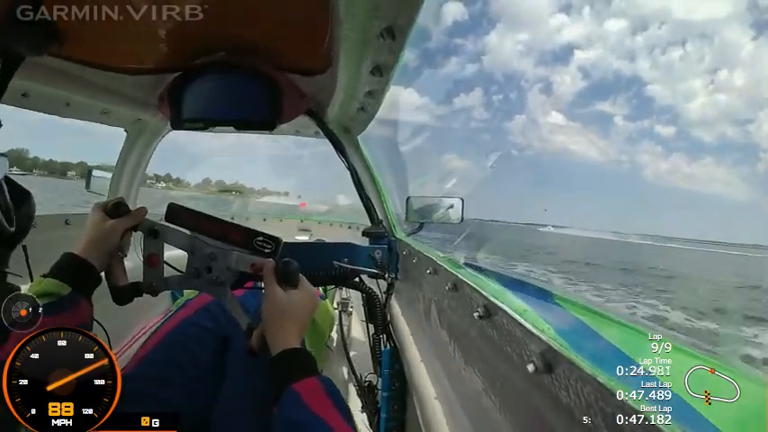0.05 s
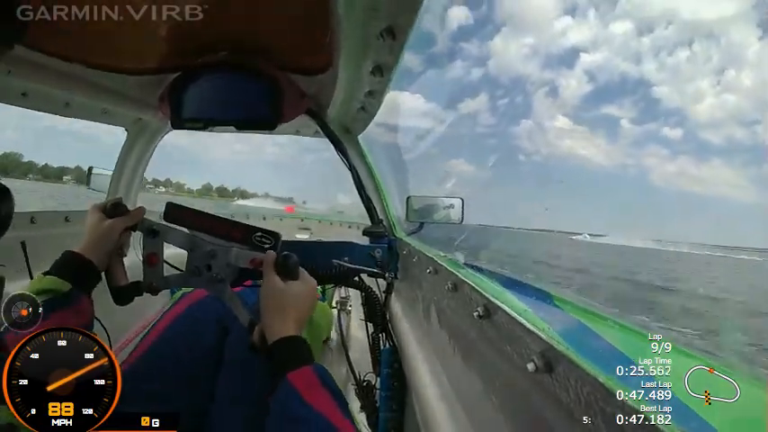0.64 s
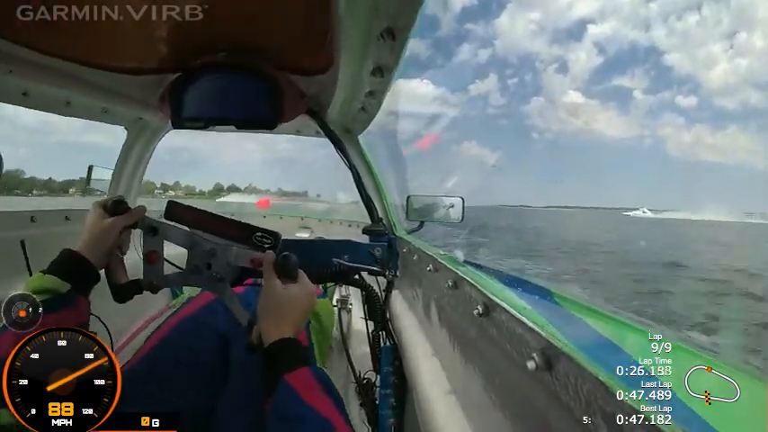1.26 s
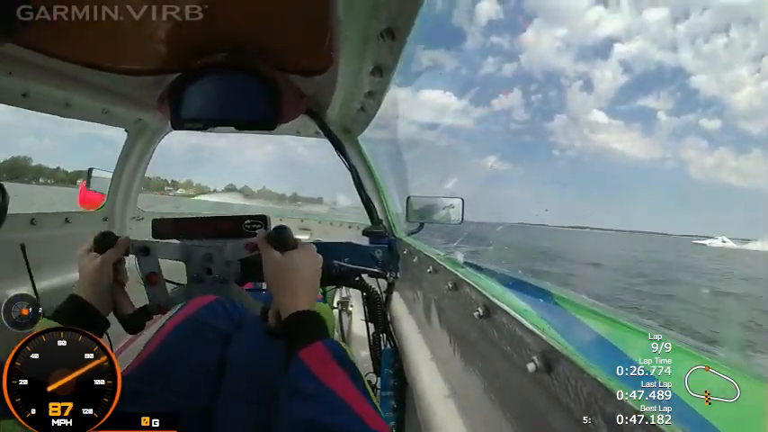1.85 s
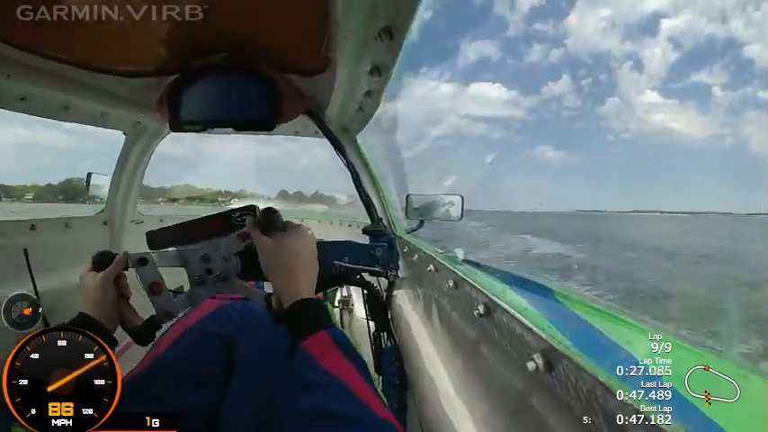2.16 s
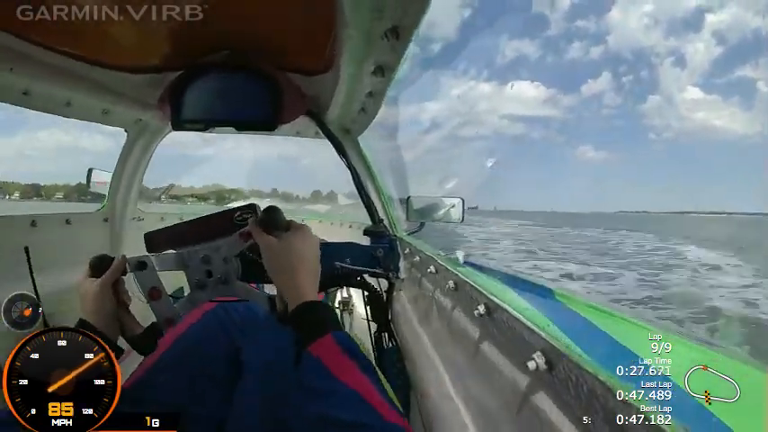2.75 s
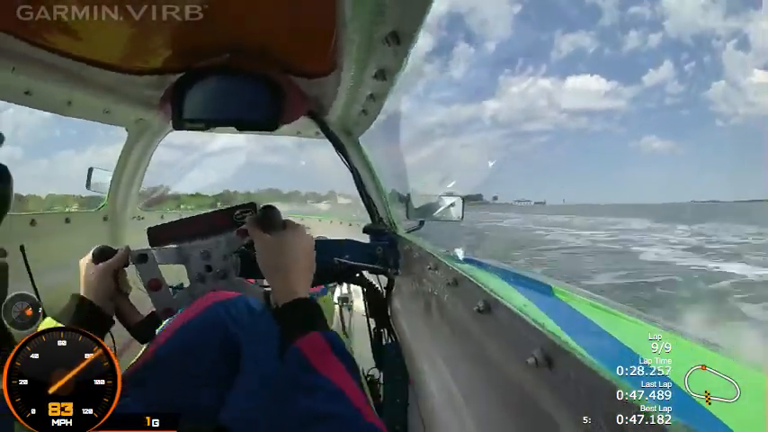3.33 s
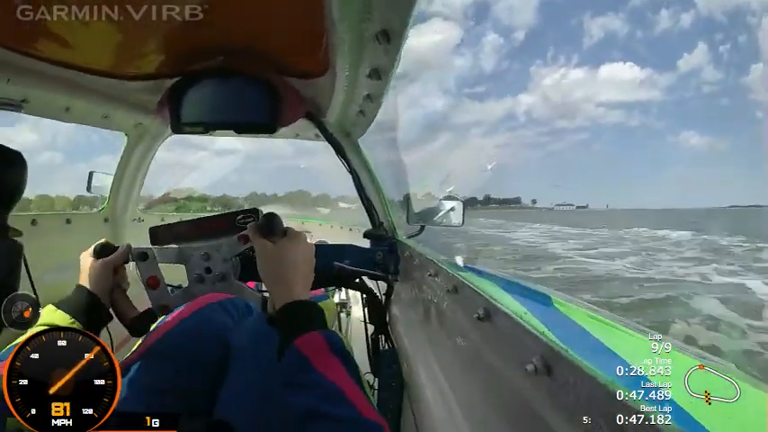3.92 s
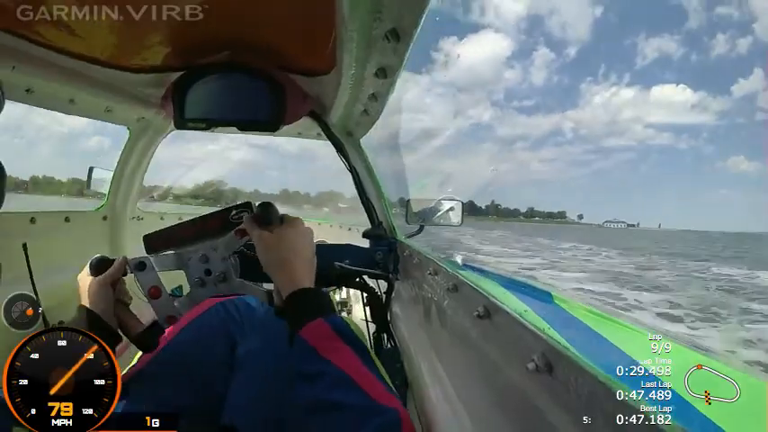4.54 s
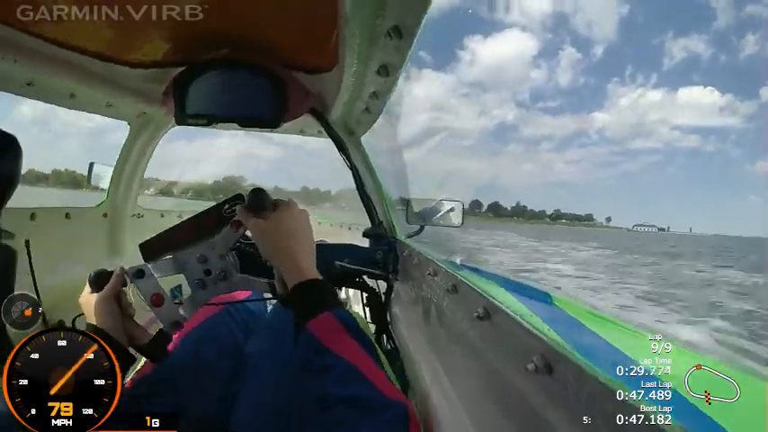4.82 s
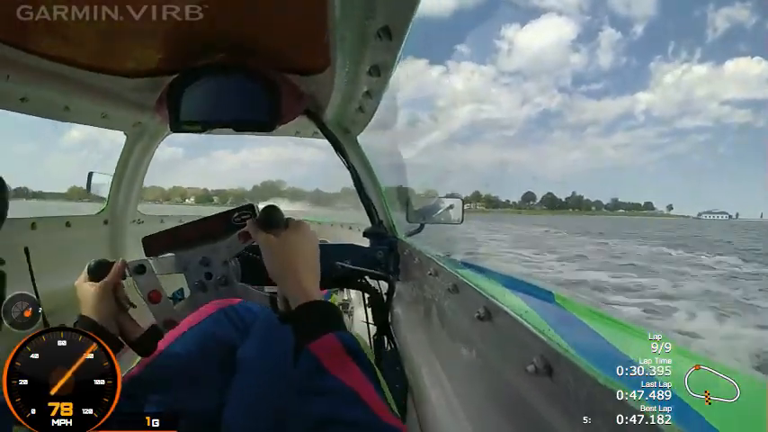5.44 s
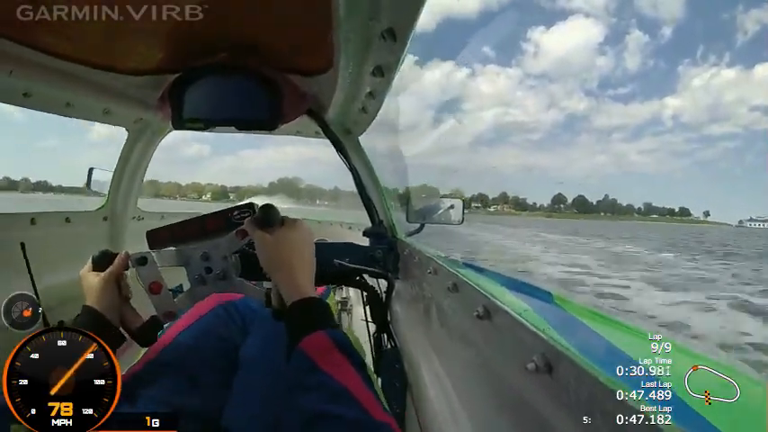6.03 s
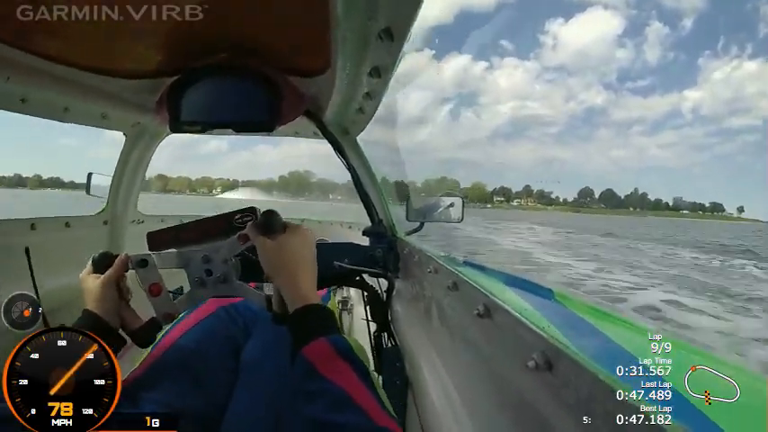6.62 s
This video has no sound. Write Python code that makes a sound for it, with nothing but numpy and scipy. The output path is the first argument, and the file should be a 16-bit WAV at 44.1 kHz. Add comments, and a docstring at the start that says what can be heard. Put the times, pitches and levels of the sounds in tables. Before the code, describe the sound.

A racing boat's engine drones loudly at full throttle from start to finish, heard inside the closed cockpit. The sound is muffled and somewhat distorted, with a nearly constant loudness. The engine's pitch keeps flicking upward and briefly sagging as the boat crosses waves. Under it, the hull drums and thumps irregularly, water rushes along the sides, and loose fittings give a faint high buzz with a few small ticks. At about 1.4 seconds the hull lands harder with a short boom. Brief slaps of spray come near 0.2 seconds and around 2 to 2.4 seconds. From about 3 to 5.3 seconds the engine wavers and surges most, with more sharp splashes around 3.3 to 3.7 and 4.3 to 4.9 seconds. One more slap comes at 6 seconds as the drone steadies a little and carries on.

```python
"""Racing boat cockpit in a turn

Inside the closed cockpit, a six-cylinder engine drones at full throttle, racing when the propeller
lifts and sagging in each wave. The hull drums, spray strikes it and loose fittings buzz and knock.
The din drives a camera's gain control and overloads its microphone, so engine and water crowd each
other out, and the camera's case muffles the sound."""
import sys
import numpy as np
from scipy import signal
from scipy.fft import rfft, irfft, next_fast_len
from scipy.io import wavfile

SR = 44100
rng = np.random.default_rng(int(sys.argv[2]) if len(sys.argv) > 2 else 0)


def store_wav(level_fs):
    """Save 16-bit WAV to argv[1]."""
    pcm = np.round(np.clip(np.atleast_2d(level_fs), -1, 1) * 32767)
    wavfile.write(sys.argv[1], SR, pcm.T.astype(np.int16))


N = 294588


def from_db(db):
    """Turn decibels into a gain to multiply by."""
    return 10 ** (np.asarray(db) / 20)


def rms_one(x):
    """Scale a signal so that its average strength (rms) is 1."""
    return x / np.sqrt(np.mean(x ** 2) + 1e-20)


def in_time(rows):
    """Join (time, value) points with straight lines, giving a value at every sample."""
    s, value = np.transpose(rows)
    return np.interp(np.arange(N) / SR, s, value)


def drift(rate):
    """A smooth random wobble of typical size 1; a higher rate makes it change faster."""
    step, warm_up = 40, 2000
    r = np.exp(-2 * np.pi * step * rate / SR)
    white = rng.standard_normal(N // step + warm_up + 2)
    slow = signal.lfilter([1], [1, -2 * r, r * r], white)[warm_up:]
    return np.interp(np.arange(N) / step, np.arange(len(slow)), rms_one(slow))


def colour(x, points):
    """Filter a sound so that its gain follows (frequency, level) points."""
    size = 2 * next_fast_len(N // 2 + SR // 2)
    hz, db = np.transpose(points)
    grid_hz = np.maximum(np.arange(size // 2 + 1) * SR / size, 1)
    gain = from_db(np.interp(np.log(grid_hz), np.log(hz), db))
    # minimum phase: the filter rings after a sound, never before it
    cepstrum = irfft(np.log(gain))
    response = np.exp(rfft(2 * cepstrum[:size // 2], size) - cepstrum[0])
    return irfft(rfft(x, size) * response)[:N]


def noise(points):
    """Noise of strength 1, shaped by (frequency, level) points."""
    return rms_one(colour(rng.standard_normal(N), points))


def swells(times, lengths, heights):
    """Add up smooth bell-shaped swells, each centred on its time."""
    t = np.arange(0, N, 40) / SR
    bells = np.exp(-np.pi * ((t[:, None] - times) / lengths) ** 2)
    return np.interp(np.arange(N) / SR, t, bells @ heights)


def burst(s, db, decay_s):
    """A loudness curve that jumps up at time s and dies away."""
    out, t = np.zeros(N + SR), np.arange(SR // 10) / SR
    start = round(s * SR)
    out[start:start + len(t)] = from_db(db) * np.exp(-t / decay_s)
    return out[:N]


def ring(x, hz, width_hz):
    """Make a sound ring at one pitch; a narrower width rings longer."""
    r = np.exp(-np.pi * width_hz / SR)
    feedback = [1, -2 * r * np.cos(2 * np.pi * hz / SR), r * r]
    return np.sqrt((1 - r * r) / 2) * signal.lfilter([1, 0, -1], feedback, x)


def wandering(hz, spread, rate):
    """A resonance kept sounding: a tone whose pitch strays by about the fraction spread."""
    pitch_hz = hz * (1 + spread * drift(rate))
    return np.sqrt(2) * np.sin(2 * np.pi * np.cumsum(pitch_hz) / SR)


def waves():
    """Three curves for what the waves do: drag the propeller, pound the hull, make the cockpit boom."""
    # each wave the hull runs through: crest t/s, length/s, relative pounding/dB, relative boom/dB
    crests = [(0.081, 0.05, 6.5, -1.5), (0.235, 0.05, -5, -17.5), (0.331, 0.054, 1, 0),
              (0.517, 0.057, -7.5, -10), (0.62, 0.078, -2.5, 2.5), (0.742, .04, -3.5, -8),
              (0.852, 0.052, -4, -8.5), (0.934, 0.084, 2, -1.5), (1.24, 0.049, -3, -21.5),
              (1.436, .12, -1, -7.5), (1.609, .045, 3.5, -11), (1.684, 0.059, -0.5, 4),
              (1.789, 0.094, -11.5, -2.5), (1.992, 0.043, 5, -12.5), (2.125, 0.042, -2.5, -15.5),
              (2.239, 0.071, 3, -3), (2.572, .05, 1.5, -20.5), (2.901, 0.036, 1, -16),
              (3.021, 0.069, 2, -11), (3.162, .06, 0.5, -19), (3.247, 0.077, 3.5, -14.5),
              (3.483, 0.057, 9, -13), (3.596, 0.046, -2, -6.5), (3.708, 0.061, 8.5, -5.5),
              (3.784, 0.058, 2.5, -5), (3.899, 0.044, -8, -14.5), (3.99, 0.034, -3, -18.5),
              (4.119, 0.065, -3, -5.5), (4.345, 0.084, 0.5, -16), (4.512, .04, -7, -14),
              (4.643, .045, 5, -8.5), (4.914, .052, -1.5, -4), (4.969, .05, 1.5, -7.5),
              (5.051, 0.075, 2, -10.5), (5.174, .045, -2, -10.5), (5.274, 0.094, -4, -7),
              (5.455, 0.035, -1.5, -11), (5.673, .045, -1.5, -6), (5.771, .08, -14, -6),
              (5.865, .04, 0, -6), (5.94, .035, -3, -4), (6.018, .05, -1, -4), (6.135, .05, -2, 0),
              (6.222, 0.076, -8, -1), (6.318, .045, 1.5, -5), (6.424, .07, -3, 2.5), (6.522, .07, 3.5, -5),
              (6.645, 0.04, -5.5, -4)]
    s, length, pounding_db, boom_db = np.transpose(crests)
    heights = np.ones(len(s)), from_db(pounding_db), from_db(boom_db)
    return [swells(s, length, height) for height in heights]


def knocks(level_db=40.0, contact_s=0.0043, bounce_s=0.0099, bounce_db=-6.5, main_hz=4900, detune=0.06):
    """A loose fitting hits its seat and bounces once, ringing at two pitches that vary with each knock."""
    # knocks: t/s, relative peak/dB, upper ring f/Hz, upper ring against main ring/dB
    hits = [(0.073, -52.5, 9080, 5.5), (0.083, -50.5, 9170, 2.5), (0.482, -51, 9270, -1),
            (0.974, -54.5, 9040, 5.5), (1.557, -55, 8730, -7), (1.578, -54.5, 9070, -3),
            (1.594, -47, 10530, -1.5), (1.617, -51.5, 10620, -3.5), (1.641, -47, 10860, -4),
            (1.742, -46.5, 9050, -7.5), (3.012, -53.5, 10400, 3.5), (3.77, -57, 10470, 9.5),
            (4.235, -47, 9010, -6), (4.72, -50.5, 9010, -6.5), (4.91, -46, 9200, -13.5),
            (4.93, -47, 10570, -4), (4.972, -48.5, 10340, -3), (5.015, -45, 10200, -1)]
    out = 0
    hush = 1e-18 * rng.standard_normal(N)  # too faint to hear; keeps the filters off tiny, slow numbers
    for (s, db, upper_hz, upper_db), (late, off) in zip(hits, rng.uniform(-1, 1, (len(hits), 2))):
        strike = burst(s, level_db + db, contact_s)
        bounce = burst(s + bounce_s * (1 + .5 * late), level_db + db + bounce_db, contact_s)
        contact = (strike + bounce) * rng.standard_normal(N) + hush
        main_ring = ring(contact, main_hz * (1 + detune * off), width_hz=430)
        upper_ring = from_db(upper_db) * ring(contact, upper_hz, width_hz=600)
        out = out + main_ring + upper_ring
    return out


def buzz(angle, pounding, per_turn_db=3.0, per_firing_db=9.0, jolt_db=5.5):
    """Loose fittings chatter at each crankshaft turn and each firing, harder when a wave jolts them."""
    # how strongly the fittings buzz: t/s, relative level/dB
    loudness = [(0, -24.5), (0.6, -27.5), (1.1, -24.5), (1.4, -28), (1.7, -21.5), (1.9, -28.5), (2.6, -26),
                (3.3, -27.5), (4.6, -25.5), (4.95, -24.5), (5.9, -28), (6.68, -26.5)]
    # ring of the fittings: f/Hz, relative level/dB
    spectrum = [(2000, -35.5), (3900, -14.5), (4900, 3), (6200, -12), (7800, -10.5), (9000, -2),
                (12000, -12.5)]
    shake_db = per_turn_db * np.cos(angle) + per_firing_db * np.cos(3 * angle)
    return from_db(in_time(loudness) + shake_db + jolt_db * pounding) * noise(spectrum)


def slaps(level_db=36.5, snap_db=31.5, droplets_db=4.0, fine_drops_db=5.5):
    """Each lump of spray cracks on the hull as a cluster of uneven drops; the finest add a bright snap."""
    # slaps of spray: t/s, relative peak/dB, decay/s, brightness/dB
    hits = [(0.198, -46, .014, -1), (0.211, -42, .026, 0), (0.438, -47.5, 0.0088, 1),
            (0.903, -54, .016, 2.5), (2.0, -48, 0.009, -1), (2.012, -41, .024, 1), (2.06, -48, 0.0067, -1),
            (2.205, -47.5, 0.015, -1.5), (2.221, -38.5, .011, -0.5), (2.312, -47, .014, -0.5),
            (2.375, -44.5, .012, -2), (3.042, -43.5, .012, -0.5), (3.19, -49, .03, 0.5),
            (3.322, -42.5, 0.0083, 5.5), (3.442, -43.5, .012, 0), (3.459, -37.5, .014, 1.5),
            (3.517, -41, 0.0062, -1), (3.525, -37, 0.0053, 2), (3.668, -44, 0.021, -6),
            (3.675, -38, 0.0023, -4), (3.685, -33, 0.0028, -6.5), (3.695, -36, 0.0022, -6),
            (3.895, -48, .015, 0.5), (4.245, -47, .015, 0), (4.308, -45.5, .016, 1), (4.332, -39, .009, 1),
            (4.411, -46.5, 0.02, 2.5), (4.634, -43, .008, -1.5), (4.644, -39.5, .007, -1),
            (4.653, -40.5, .012, 0.5), (4.86, -47, .01, -2.5), (4.915, -46.5, .025, 0),
            (6.013, -39.5, .02, -2)]
    # body of a slap: f/Hz, relative level/dB
    body_spectrum = [(300, -7), (1500, 9), (3000, 5), (4800, -0.5), (7500, -8.5), (16000, -25)]
    # snap of the finest drops: f/Hz, relative level/dB
    snap_spectrum = [(2000, -18.5), (4800, 2), (7500, 5), (11000, 3), (16000, -8)]
    body_bursts = sum(burst(s, level_db + db, decay_s) for s, db, decay_s, _ in hits)
    snap_bursts = sum(burst(s, snap_db + db + bright_db, decay_s) for s, db, decay_s, bright_db in hits)
    body = body_bursts * rms_one(from_db(droplets_db * drift(250))) * noise(body_spectrum)
    snap = snap_bursts * rms_one(from_db(fine_drops_db * drift(600))) * noise(snap_spectrum)
    return body + snap


def spray(level_db=44.5, patchy_db=1.93):
    """Sheets of water rush along the sides."""
    # spray along the hull, thickest in the turn: t/s, relative level/dB
    loudness = [(0, -52), (0.63, -57), (0.95, -54.5), (1.15, -52.5), (1.35, -54), (1.82, -58.5),
                (1.98, -55.5), (2.03, -52.5), (2.8, -53), (3.6, -53), (4.0, -52), (4.7, -52), (5.4, -51.5),
                (5.95, -54), (6.68, -53)]
    # rush of the spray: f/Hz, relative level/dB
    spectrum = [(150, -10.5), (400, -2), (700, -5), (1300, -3), (2200, -10.5), (4500, -19.5), (12000, -26)]
    return from_db(level_db + in_time(loudness) + patchy_db * drift(34)) * noise(spectrum)


def hull(pounding, ripple_db=-9, lumpy_db=2.5, ceiling_db=9.0, thump_db=-7.5, thump_hz=104.12):
    """The hull drums unevenly over ripples, thumps deeply in each wave and rings when it lands hard."""
    # drumming, with the cockpit's resonance near the engine's firing rate: f/Hz, relative level/dB
    drum_spectrum = [(20, -1.5), (40, -1), (70, -5.5), (110, 0), (160, -4), (250, -1), (325, 3.5),
                     (410, -1), (520, -7), (750, -13), (1200, -23), (2500, -36.5)]
    # the hull slams into a wave and booms until it lifts clear: t/s, level/dB
    slam_loudness = [(1.3, -40.5), (1.38, -6), (1.42, 1), (1.46, 3), (1.497, 0.5), (1.512, -49.5)]
    # boom of that hard landing: f/Hz, relative level/dB
    slam_spectrum = [(60, -6), (150, -8.5), (380, -8), (460, -2), (520, 2.5), (580, -1), (650, -0.5),
                     (700, -6), (745, -1.5), (830, -17), (1600, -35)]
    strength = (from_db(ripple_db) + pounding) * from_db(lumpy_db * drift(26))
    drumming = np.minimum(strength, from_db(ceiling_db)) * noise(drum_spectrum)
    thumps = from_db(thump_db) * pounding * wandering(thump_hz, spread=0.1988, rate=35)
    slam = from_db(in_time(slam_loudness)) * noise(slam_spectrum)
    return drumming + thumps + slam


def cockpit(boom, boom_hz=201.3, level_db=-3.5, between_waves_db=-23, waver_db=2.5):
    """The cockpit booms at its own pitch when a wave pushes on the hull."""
    strength = from_db(between_waves_db) + from_db(level_db) * boom
    return strength * from_db(waver_db * drift(37)) * wandering(boom_hz, spread=0.031, rate=30.4)


def racing():
    """Extra firings per second as the propeller lifts and the engine races."""
    # each lift of the propeller: peak t/s, length/s, rise in firing rate/Hz
    lifts = [(0.035, 0.15, 17), (0.207, 0.03282, 18.7), (0.42, 0.051, 16.8), (0.597, 0.091, 11.54),
             (0.734, 0.065, 18.3), (0.834, 0.05, 22.4), (1.07, 0.051, 25.2), (1.166, 0.074, 26),
             (1.567, 0.076, 25.2), (1.65, 0.031, 33), (1.948, 0.159, 34), (2.256, 0.16, 24),
             (2.491, 0.1, 17), (2.662, 0.17, 11.85), (2.849, 0.11, 32), (2.958, 0.068, 25.9),
             (3.056, 0.088, 17), (3.185, 0.106, 37), (3.32, 0.071, 27.6), (3.47, 0.029, 13.7),
             (3.55, 0.14, 31.5), (3.763, 0.16, 16.4), (3.848, 0.058, 24.8), (3.926, 0.057, 34.2),
             (4.012, 0.053, 27.6), (4.159, 0.032, 14.74), (4.264, 0.14, 16.1), (4.439, 0.099, 19.9),
             (4.581, 0.027, 17.95), (4.801, 0.103, 34), (4.952, 0.03073, 29.88), (5.069, 0.14, 29.8),
             (5.223, 0.03, 15), (5.312, 0.095, 19.8), (5.465, 0.04, 19.6), (5.54, 0.032, 18.2),
             (5.623, 0.041, 23.9), (6.033, 0.036, 24), (6.324, 0.032, 27.2), (6.462, 0.05, 13.4),
             (6.575, 0.05, 11.8)]
    return swells(*np.transpose(lifts))


def crank_angle(race_hz, drag, wave_drag_hz=2, shudder=11.0):
    """How far the crankshaft has turned, in radians: it races, sags in waves, wanders and shudders."""
    # engine speed with the propeller running deep: t/s, firing rate/Hz
    cruise = [(0.0, 315), (0.95, 314.5), (1.35, 326), (1.76, 307), (2.5, 317.5), (3.4, 309), (3.8, 317),
              (4.1, 311), (5.1, 316), (5.75, 309), (6.1, 305), (6.68, 312)]
    # brief sags in engine speed: lowest point t/s, length/s, drop in firing rate/Hz
    sags = [(0.28, 0.052, 7.4), (0.475, 0.052, 8.9), (0.675, 0.029, 12.6), (1.23, 0.039, 24.2),
            (1.42, .06, 16.5), (1.71, .05, 8.4), (2.044, 0.043, 18), (3.11, .03, 23.3),
            (3.268, 0.037, 32.8), (3.428, .05, 9.74), (4.512, .03, 22.5), (4.62, 0.029, 11.7),
            (4.89, .045, 40), (5.025, 0.032, 20.1), (5.19, 0.033, 26.7), (5.37, 0.036, 14),
            (5.6, .03, 10.6), (6.369, .03, 13.4)]
    # the propeller loses and regains its grip, most in the turn: t/s, speed wobble/fraction
    slipping = [(0, 0.00699), (2.6, 0.007), (3.0, .015), (5.3, .015), (5.7, .009), (6.68, .009)]
    firing_hz = in_time(cruise) + race_hz - swells(*np.transpose(sags)) - wave_drag_hz * drag
    crank_hz = firing_hz / 3  # six cylinders fire three times per turn
    flutter = in_time(slipping)
    turns = np.cumsum(crank_hz * (1 + flutter * drift(45))) / SR
    return 2 * np.pi * turns + shudder * flutter * drift(55)


def engine(angle, firing_waver_db=1.0, uneven_db=2.5, jitter_rad=0.055):
    """Tones locked to the crankshaft add up to exhaust pulses; uneven burning wavers and blurs them."""
    # engine tones, where order 3 is the firing rate: order/cycles per crankshaft turn, level/dB
    tones = [(1, -26.5), (3, -3.0), (4, -30), (5, -19), (6, -14.5), (7, -19), (9, -19.5), (10, -22),
             (12, -23.5)]
    # snarl of the firing rate's overtones, clearest before the turn: t/s, boost/dB
    snarl = [(0, 2), (0.95, 1), (1.15, 4), (1.7, -1), (2.0, 1), (2.7, 2), (3.2, 0), (6.68, -0.5)]
    out, snarl_db = 0, in_time(snarl)
    for order, db in tones:
        is_firing = order == 3
        boost_db = snarl_db if order in (6, 9, 12) else 0
        blur = 0 if is_firing else jitter_rad * order * drift(27)
        waver_db = (firing_waver_db if is_firing else uneven_db) * drift(40)
        out = out + from_db(db + boost_db + waver_db) * np.sin(order * angle + blur)
    return np.sqrt(2) * out


def scene(engine_db_per_hz=-0.032, spray_db_per_hz=0.0408):
    """Engine and water together in the cockpit."""
    drag, pounding, boom = waves()
    race_hz = racing()
    angle = crank_angle(race_hz, drag)
    # a racing engine booms less and its propeller throws more spray
    drone = from_db(engine_db_per_hz * race_hz) * engine(angle)
    rush = from_db(spray_db_per_hz * race_hz) * spray()
    return (drone + cockpit(boom) + buzz(angle, pounding) + hull(pounding) + rush + slaps() + knocks())[None]


def record(dry, react_s=0.0028, squeeze=0.64, drive_db=6.0, bias=0.17, out_db=-17.5,
           split_hz=800, treble_in_db=-5.0, leak_db=-8.5, cutoff_hz=12400):
    """Fast gain control evens out the din, the microphone overloads and the case muffles the sound."""
    # the camera's case dulls the treble and rings near 5 kHz: f/Hz, gain/dB
    case = [(8, -2.5), (30, -6.5), (80, -1), (320, 1.96), (750, -2), (1300, -8.5), (2000, -16), (3000, -26),
            (4000, -28), (4800, -23), (6200, -29), (7800, -37.5), (9500, -38.5), (12000, -47)]
    bass = signal.sosfiltfilt(signal.butter(2, split_hz, fs=SR, output="sos"), dry[0])
    treble = dry[0] - bass
    din = bass + from_db(treble_in_db) * treble
    # the louder the last few milliseconds, the further the gain is turned down
    memory = np.exp(-1 / (react_s * SR))
    power, _ = signal.lfilter([1 - memory], [1, -memory], din ** 2, zi=[np.mean(din ** 2)])
    levelled = din / np.sqrt(power) ** squeeze
    squashed = np.tanh(from_db(drive_db) * (levelled - bias))  # bias flattens one side more
    # much of the treble gets past the overload, so the hiss stays steady and the cracks stay sharp
    picked_up = squashed - squashed.mean() + from_db(leak_db) * treble
    muffled = from_db(out_db) * colour(picked_up, case)
    top_cut = signal.ellip(10, .1, 80, cutoff_hz, fs=SR, output="sos")
    return signal.sosfilt(top_cut, muffled)[None]


dry = scene()
out = record(dry)
store_wav(out)
```